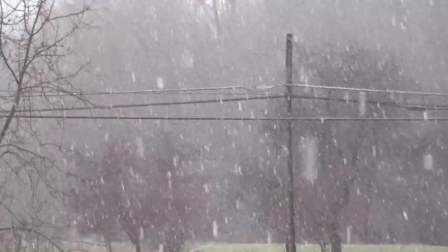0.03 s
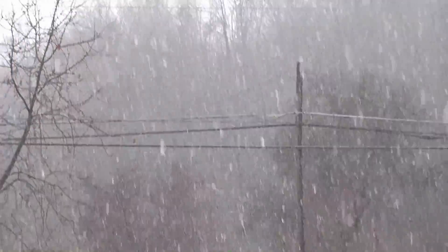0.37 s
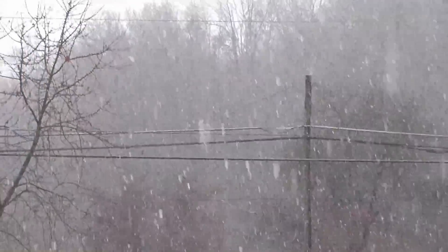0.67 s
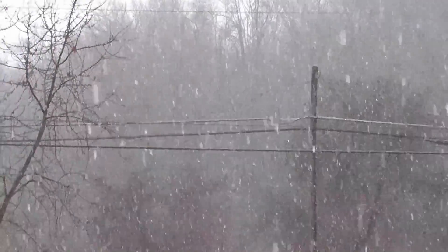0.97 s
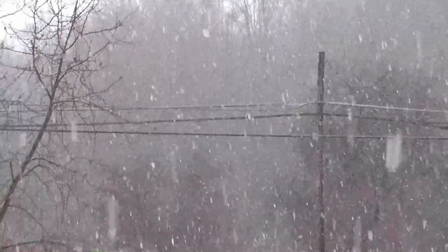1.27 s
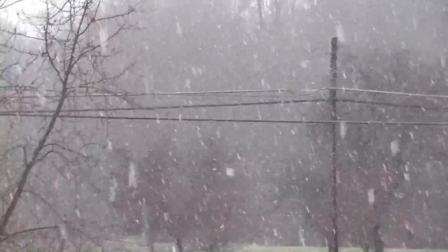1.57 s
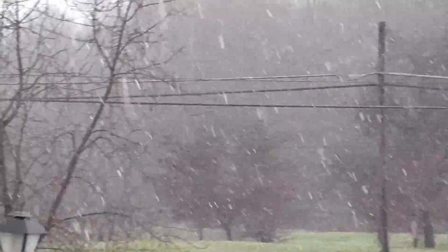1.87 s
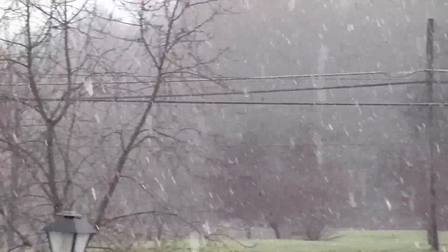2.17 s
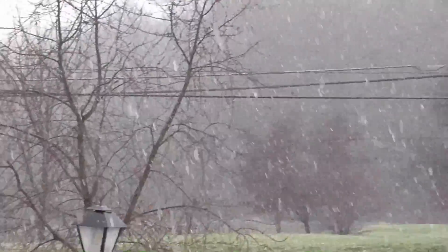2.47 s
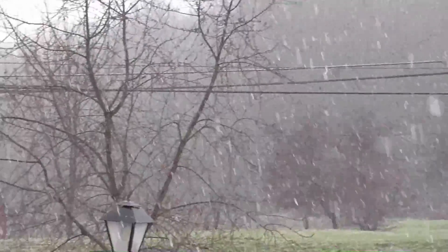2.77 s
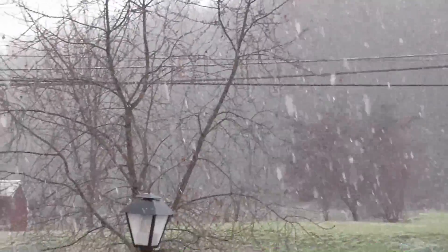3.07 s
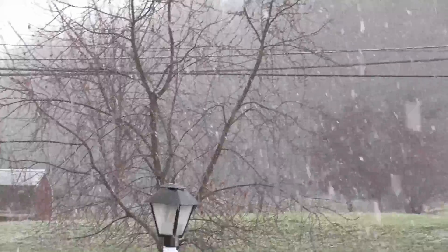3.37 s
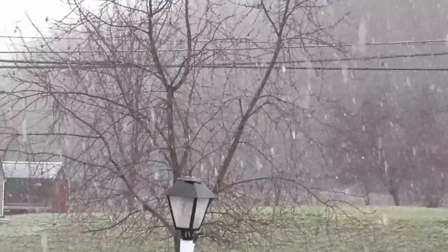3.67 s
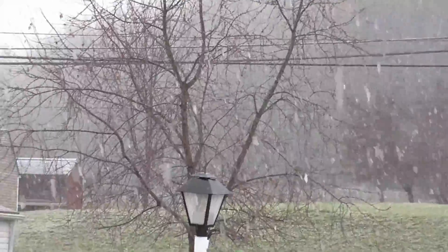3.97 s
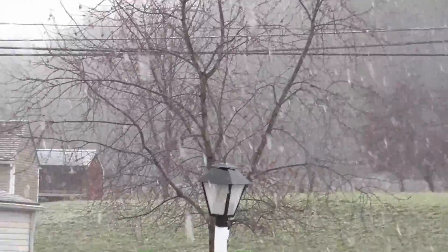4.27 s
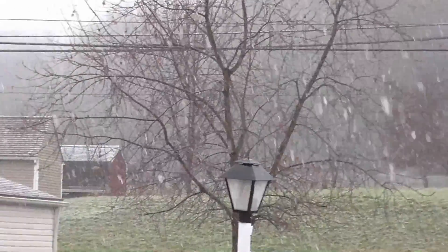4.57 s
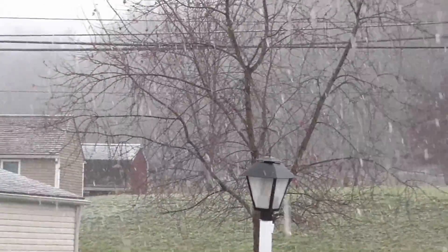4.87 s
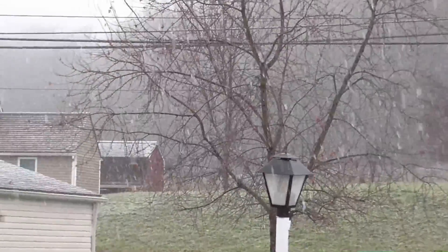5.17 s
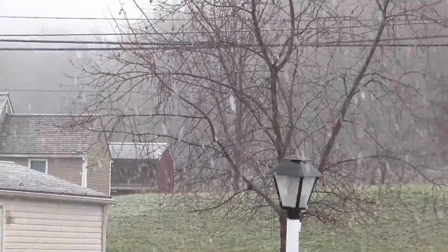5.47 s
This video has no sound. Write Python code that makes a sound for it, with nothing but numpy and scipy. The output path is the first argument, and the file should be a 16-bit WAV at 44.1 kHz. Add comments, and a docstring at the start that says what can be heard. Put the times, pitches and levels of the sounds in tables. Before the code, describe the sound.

Two cars pass one after the other on a wet road with tyre roar and hissing spray, then wet snow patters faintly.

```python
"""Two cars pass one behind the other on a wet road, heard from a garden in falling wet snow.
At first their tyres roar from afar and an engine drones over distant traffic, its pitch sinking.
Near 3 s and again near 3.5 s a car goes by: the treads ring, the body rumbles, the spray hisses,
and two shifting reflections sweep combs of peaks through the roar and the hiss.
A faint, fine high patter is turned up from about 4 s, and at 5 s a flake bursts close by."""
import sys
import numpy as np
from scipy import signal
from scipy.fft import rfft, irfft, next_fast_len
from scipy.io import wavfile
from scipy.ndimage import uniform_filter1d, map_coordinates

SR = 44100
rng = np.random.default_rng(int(sys.argv[2]) if len(sys.argv) > 2 else 0)


def to_wav(s):
    """Save 16-bit WAV."""
    ch = np.atleast_2d(s).T  # columns
    pcm = np.round(np.clip(ch, -1, 1) * 32767)  # PCM
    wavfile.write(sys.argv[1], SR, pcm.astype(np.int16))


N = 243426

# reference level that the tyre roar and the far ring, rumble and hiss follow: t/s, level/dB
ROAD_LEVEL = [(0.05, -44), (0.3, -44.5), (0.45, -45.5), (0.67, -46.5), (1.04, -45), (1.42, -47),
              (1.75, -43), (2.35, -42), (2.6, -39), (3.05, -37), (3.67, -36.5), (4.0, -44.5), (4.35, -47.5),
              (4.59, -50.5), (5.45, -52)]
# left-right coherence of sound from the road and from all round: f/Hz, coherence
DIRECT_COHERENCE = [(100, 1), (500, 0.98), (1200, 0.87), (2500, 0.75), (5300, 0.98), (10000, 0.49)]
DIFFUSE_COHERENCE = [(60, 1), (270, 0.69), (560, 0.78), (1200, 0.41), (2500, 0.51), (5300, 0.77),
                     (11000, 0.25)]
# each car on the open stretch of road: entry t/s, exit t/s, rise/(dB/s), fall/(dB/s), tread f/Hz,
# drift/(Hz/s), tread level/dB, spray level/dB, rumble level/dB, spurt gain/dB, spurt length/s
CAR_PASSES = [(2.614, 2.958, 175, 28, 902.5, 190, -39, -43.5, -59, 2.2, 0.027),
              (3.2, 3.658, 55, 58, 819.6, -41.5, -33, -41.5, -45.5, -0.6, 0.093)]
# two reflections: one's lag shrinks as the cars near, the other's grows as they leave: t/s, lag/ms, gain
NEARING_ECHO = [(0.3, 2.8, 0.2), (.65, 2.9, 0.13), (1.2, 2.4, 0.2), (1.6, 2.3, 0.23), (1.87, 2.07, 0.18),
                (2.25, 1.53, 0.048), (2.45, 1.53, 0.24), (2.64, 1.23, 0.1), (2.85, 1.016, 0.24),
                (3.05, 0.76, 0.3), (3.4, 0.33, 0)]
LEAVING_ECHO = [(2.95, 1.5, 0), (3.2, 1.5, 0.079), (3.8, 1.93, 0.26), (4.1, 1.92, 0.087), (4.5, 1.95, 0.11)]


def amp(db):
    """Amplitude ratio of a level: tenfold for every 20 dB."""
    return 10 ** (np.asarray(db) / 20)


def unit(x):
    """Normalisation to rms 1."""
    return x / np.sqrt(np.mean(x ** 2) + 1e-20)


def seconds():
    """The time of every sample."""
    return np.arange(N) / SR


def along(points, hz):
    """Interpolation of (f/Hz, value) points on a logarithmic frequency axis."""
    f, values = np.transpose(points)
    return np.interp(np.log(hz + 1), np.log(f + 1), values)


def curves(rows):
    """Linear interpolation in time: one curve for each column after t/s."""
    times, *columns = np.transpose(rows)
    return [np.interp(seconds(), times, column) for column in columns]


def swell(start, end, rise, fall):
    """Exponential growth and decay, in dB: 0 from start to end, with slopes in dB/s on either side."""
    t = seconds()
    return -rise * np.maximum(start - t, 0) - fall * np.maximum(t - end, 0)


def wobble(rate):
    """Slow random modulation: a spline through rate knots a second."""
    knots = rng.standard_normal(int(N * rate / SR) + 4)
    return map_coordinates(knots, [seconds() * rate])


def filtered(x, response):
    """Linear filtering: the spectrum of x times a frequency response."""
    size = next_fast_len(N + SR // 2)
    return irfft(rfft(x, size) * response(np.fft.rfftfreq(size, 1 / SR)), size)[..., :N]


def patchy(spread_db):
    """Two noises, amplitude-modulated in patches of time and frequency."""
    spectra = signal.stft(rng.standard_normal((2, N)), nperseg=1024)[2]
    field = uniform_filter1d(rng.standard_normal(spectra.shape[1:]), size=5, axis=0)
    field = unit(uniform_filter1d(field, size=12, axis=1))
    return unit(signal.istft(spectra * amp(spread_db * field), nperseg=1024)[1][:, :N])


def droplets(rate, spread_db):
    """Shot noise: two trains of tiny impacts of random size, on average rate a second."""
    hits = rng.random((2, N)) < rate / SR
    signs = rng.choice([-1, 1], (2, N))
    sizes = amp(spread_db * rng.standard_normal((2, N)).clip(-2, 2))
    return unit(hits * signs * sizes)


def stereo(pair, spectrum, coherence):
    """Partial coherence: two unrelated signals, coloured and mixed as mid and side to rms 1."""
    def response(hz):
        angle = np.arccos(np.clip(along(coherence, hz), -1, 1)) / 2
        return amp(along(spectrum, hz)) * [np.cos(angle), np.sin(angle)]
    mid, side = filtered(pair, response)
    return unit(np.array([mid + side, mid - side]))


def panned(x, share):
    """A level difference between the ears, scaled by share, leans a sound toward the cars."""
    bearing = [(0, -1), (1.3, 0), (3.7, -3), (4.3, -1), (5.52, -1)]  # the cars' direction: t/s, left minus right level/dB
    lean_db, = curves(bearing)
    return x * amp(share * np.array([lean_db, -lean_db]) / 2)


def narrow_band(hz, db, width_hz, steepness, side_db):
    """Narrow-band noise: slow noise modulates a carrier, which can glide as in a Doppler shift."""
    skirt = lambda f: 1 / np.sqrt(1 + (2 * f / width_hz) ** steepness)
    in_phase, quadrature = filtered(rng.standard_normal((2, 2, N)), skirt)
    phase = 2 * np.pi * np.cumsum(hz * np.ones(N)) / SR
    mid, side = unit(in_phase * np.cos(phase) + quadrature * np.sin(phase))
    return amp(db) * np.array([mid + amp(side_db) * side, mid - amp(side_db) * side])


def tones(rows, rise, fall, width_hz, steepness, side_db):
    """One band of noise for each row, growing and decaying at rise and fall dB/s."""
    return sum(narrow_band(hz, db + swell(start, end, rise, fall), width_hz, steepness, side_db)
               for start, end, hz, db in rows)


def reflected(x, path, share):
    """Interference with a reflection of changing lag sweeps a comb of peaks through the sound."""
    lag_ms, gain = curves(path)
    positions = np.arange(N) - lag_ms * SR / 1000
    late = np.array([map_coordinates(channel, [positions]) for channel in x])
    return (x + share * gain * late) / np.hypot(1, share * gain)


def distant_traffic():
    """Far vehicles merge into a diffuse field of low, nearly steady noise."""
    spectrum = [(25, -36), (48, -8), (66, 5.5), (80, -3), (118, 3), (175, -2), (270, -0.5), (350, -0.5),
                (450, 1), (560, 1.5), (800, 1), (1050, -5), (1500, -5.5), (2500, -24), (6000, -62)]  # traffic hum: f/Hz, density level/dB
    return amp(-48.0 + 0.27 * wobble(3.04)) * stereo(patchy(spread_db=1.2), spectrum, DIFFUSE_COHERENCE)


def high_patter():
    """Shot noise and hiss make a faint, fine high patter, turned up from about 4 s."""
    patter_level = [(0, -70), (4.0, -78), (4.6, -65.5), (5.52, -63.5)]  # level of the high patter: t/s, level/dB
    spectrum = [(1500, -6), (2800, 2.5), (4300, 5.5), (6500, -1.5), (9000, -6), (11000, -6), (12500, -23),
                (14300, -24)]  # its colour: f/Hz, density level/dB
    db, = curves(patter_level)
    patter = unit(patchy(spread_db=-1.5) + 0.49 * droplets(rate=400, spread_db=5))
    return amp(db) * stereo(patter, spectrum, DIFFUSE_COHERENCE)


def snow_splat(t60=0.075):
    """A heavy flake bursts close by: a bright noise transient with exponential decay."""
    landings = [(4.994, -59.5)]  # the impact: t/s, level/dB
    spectrum = [(2500, -20), (5000, -1), (8000, 2), (10500, 5), (13500, -13), (14500, -21)]  # bursting flake: f/Hz, density level/dB
    t = seconds()
    envelope = sum(amp(db - 60 * np.abs(t - start) / t60) * (t >= start) for start, db in landings)
    return envelope * stereo(rng.standard_normal((2, N)), spectrum, DIFFUSE_COHERENCE)


def engine(firing_hz=58, doppler_share=0.0734, glide_centre_s=2, glide_s=0.845):
    """Periodic firing gives a note that sinks by the Doppler effect, over an uneven exhaust burble."""
    hz = firing_hz * (1 - doppler_share * np.tanh((seconds() - glide_centre_s) / glide_s))
    phase = 2 * np.pi * np.cumsum(hz + 0.75 * wobble(6.6)) / SR
    note_db = -54.5 + swell(0, 1.74, rise=0, fall=13) + 1.1 * wobble(5.4)
    note = amp(note_db) * unit(np.sin(phase) + amp(-14) * np.sin(2 * phase))
    leaves = CAR_PASSES[0][1]  # the burble is loudest just behind the first car
    far = amp(-55.5 + swell(0, leaves, rise=0, fall=5.6))
    near = amp(-54 + swell(leaves, leaves, rise=45, fall=15))
    burble = np.hypot(far, near) * narrow_band(hz=101.6, db=0, width_hz=43, steepness=5.0, side_db=-16.0)
    return panned(note + burble, share=0.6)


def spray(car, spectrum, axle_gap_s=0.29, rear_share=0.65):
    """Atomisation: water torn off the treads hisses; each axle's spurt briefly shifts the level."""
    enters, leaves, rise, fall, *_, spray_db, _, spurt_db, spurt_s = car
    axles = (enters, 1), (enters + axle_gap_s, rear_share)
    spurts = sum(share * amp(swell(s, s + spurt_s, rise=230, fall=230)) for s, share in axles)
    db = spray_db + swell(enters, leaves, rise, fall) + spurt_db * spurts
    mist = unit(patchy(spread_db=2.9) + 0.5 * droplets(rate=2000, spread_db=8.5))
    return amp(db + 0.9 * wobble(22.02)) * stereo(mist, spectrum, DIRECT_COHERENCE)


def road_water():
    """Countless drops sum to broadband hiss, dull from afar and bright close by; single drops tick."""
    # hiss of the far road and of each car's spray: f/Hz, density level/dB
    far_spectrum = [(1200, -19), (2100, -5), (2700, -1), (3300, 1.5), (4300, 0.5), (5600, -2), (7000, -8),
                    (8500, -14), (10000, -22.5), (11000, -54)]
    first_spectrum = [(1500, -1), (2500, -8.5), (2900, -3.5), (3300, -0.5), (4400, -2), (5400, -2.5),
                      (6400, 1), (7600, -4.5), (9000, -8.5), (10400, -14), (11600, -42), (12500, -76)]
    second_spectrum = [(1200, -28), (2000, -28), (2650, -1.5), (3400, 2.5), (4600, 4), (6200, 1.5),
                       (7200, -3), (8800, -5.5), (9800, -14), (10800, -48), (12000, -76)]
    # thicker hiss in wetter stretches and behind the cars: start t/s, end t/s, added level/dB
    mists = [(0, 0.197, 2.5), (1.668, 1.873, 1), (2.401, 2.58, 0), (3.786, 4.62, 3.5)]
    flung_drops = [(2.61, 2.618, 7000, -45.5), (2.635, 2.648, 5030, -43.5), (2.763, 2.765, 6350, -40),
                   (3.325, 3.33, 8500, -50), (3.51, 3.511, 6170, -35)]  # ticks in the spray: start t/s, end t/s, f/Hz, level/dB
    road_db, = curves(ROAD_LEVEL)
    mist_db = sum(db * amp(swell(start, end, rise=41, fall=27)) for start, end, db in mists)
    far_db = road_db - 9 + mist_db + 0.16 * wobble(20)
    far = amp(far_db) * stereo(patchy(spread_db=0.9), far_spectrum, DIFFUSE_COHERENCE)
    far = reflected(far, NEARING_ECHO, share=0.28)
    first = reflected(spray(CAR_PASSES[0], first_spectrum), NEARING_ECHO, share=0.9)
    second = spray(CAR_PASSES[1], second_spectrum)
    hiss = first + reflected(far + second, LEAVING_ECHO, share=0.93)
    ticks = tones(flung_drops, rise=30000, fall=6996, width_hz=3100, steepness=10, side_db=-16)
    return panned(hiss + ticks, share=1.2)


def tread_knocks(attack_s=0.0014, t60=0.026):
    """Damped oscillation: two short pitched knocks in the first car's tread ring."""
    onsets = [(2.784, 838, -12.5), (2.923, 934, -19)]  # the knocks: t/s, f/Hz, level/dB
    knocks = np.zeros(N)
    for start, hz, db in onsets:
        t = np.maximum(seconds() - start, 0)
        envelope = amp(db - 60 * t / t60) * (1 - np.exp(-t / attack_s))
        knocks += envelope * np.sin(2 * np.pi * hz * t)
    return panned(knocks, share=0.4)


def brief_tones():
    """Narrow bands of noise are heard as pitch: flares, howls, whines and booms stand out of the roar."""
    # each table: start t/s, end t/s, f/Hz, level/dB
    flares = [(2.6, 2.65, 894, -41.5), (2.77, 2.85, 889, -32.5), (2.925, 2.975, 950, -36.5),
              (3.2, 3.46, 839, -40)]  # surges of the tread ring
    howls = [(1.05, 1.2, 449.7, -50.5), (1.7, 2.0, 506, -47.5), (2.05, 2.6, 568.6, -47.5),
             (3.3, 3.62, 549, -49)]  # low tones where a reflection reinforces the roar
    whines = [(0, .3, 1010, -46), (.15, .33, 747, -47), (.98, 1.25, 878, -48.5), (.98, 1.13, 1500, -51),
              (1.68, 1.88, 874, -49), (1.65, 1.8, 1400, -59.5), (1.93, 2.08, 1012, -44),
              (2.45, 2.58, 790, -49)]  # thin, higher tones of the same kind
    booms = [(.03, .1, 146.5, -48.5), (.79, .83, 275.6, -50), (1.35, 2.15, 129.8, -56),
             (1.64, 1.7, 286, -49), (1.865, 1.885, 500, -43.5), (2.13, 2.17, 259.2, -52),
             (2.68, 2.78, 169.6, -50), (2.92, 3.03, 160, -45), (3.09, 3.14, 289.6, -42),
             (3.4, 3.75, 199.6, -48.5), (4.3, 4.4, 134.5, -55.5)]  # hollow notes of the rolling cars, and at 1.87 s a brief 500 Hz howl
    flare = tones(flares, rise=139, fall=108, width_hz=250, steepness=13, side_db=-30)
    howl = tones(howls, rise=46, fall=41, width_hz=157, steepness=3.4, side_db=-17.0)
    whine = tones(whines, rise=48, fall=53, width_hz=86, steepness=3.57, side_db=-11.0)
    boom = tones(booms, rise=57, fall=56, width_hz=71, steepness=4.9, side_db=-19.0)
    return panned(flare + howl + whine + boom, share=0.31)


def body_rumble(usual_road_db=-44.5, bass_follows=0.33):
    """Structure-borne sound: the tyres shake the car bodies; far and near rumble add in power."""
    spectrum = [(25, -46), (35, -42), (60, -13), (90, -9), (125, -0.5), (195, -3), (280, 5.5), (345, 1),
                (430, -3), (700, -40), (1500, -73)]  # vibrating bodies: f/Hz, density level/dB
    road_db, = curves(ROAD_LEVEL)
    # the bass swells less than the roar
    shaking = amp(usual_road_db - 5.5 + bass_follows * (road_db - usual_road_db))
    for enters, leaves, rise, fall, *_, rumble_db, _, _ in CAR_PASSES:
        shaking = np.hypot(shaking, amp(rumble_db + swell(enters, leaves, rise, fall)))
    return shaking * stereo(patchy(spread_db=0.5), spectrum, DIRECT_COHERENCE)


def tread_ring(sag_db_per_s=14):
    """The grooves resonate and radiate mostly forward, so the ring swells early and sags in passing."""
    road_db, = curves(ROAD_LEVEL)
    ring = narrow_band(hz=874, db=road_db - 7, width_hz=230, steepness=4.2, side_db=-11.5)  # far treads
    for enters, leaves, _, fall, tread_hz, drift, tread_db, *_ in CAR_PASSES:
        run_s = np.clip(seconds(), enters, leaves) - enters
        hz = tread_hz + drift * (run_s - (leaves - enters) / 2)
        db = tread_db + swell(enters, leaves, rise=65, fall=fall) - sag_db_per_s * run_s
        ring += narrow_band(hz, db, width_hz=210, steepness=5.7, side_db=-17.0)
    return ring


def tyre_roar():
    """Rolling noise: rubber on wet asphalt radiates a broad band, comb-filtered by two reflections."""
    spectrum = [(300, -29), (480, -11.5), (700, -0.5), (1000, 0), (1250, 0), (1650, -2), (2000, -5.5),
                (2300, -12.5), (2700, -23.5), (4000, -86)]  # rolling tyres: f/Hz, density level/dB
    road_db, = curves(ROAD_LEVEL)
    db = road_db + 2.5 + 0.29 * wobble(15)
    roar = amp(db) * stereo(patchy(spread_db=0.87), spectrum, DIRECT_COHERENCE)
    roar = reflected(roar, NEARING_ECHO, share=0.9)
    return reflected(roar, LEAVING_ECHO, share=0.9)


def scene():
    """Superposition: the sound pressures of road and garden add."""
    rolling = panned(tyre_roar() + tread_ring() + body_rumble(), share=0.44)
    cars = rolling + brief_tones() + tread_knocks() + road_water() + engine()
    return cars + distant_traffic() + high_patter() + snow_splat()


def record(dry, top_hz=14300):
    """An ideal low-pass filter removes everything above the band limit."""
    return filtered(dry, lambda hz: hz < top_hz)


dry = scene()
out = record(dry)
to_wav(out)
```